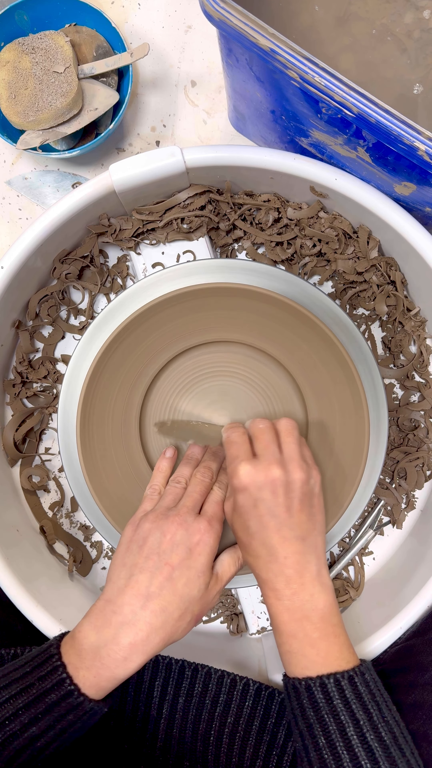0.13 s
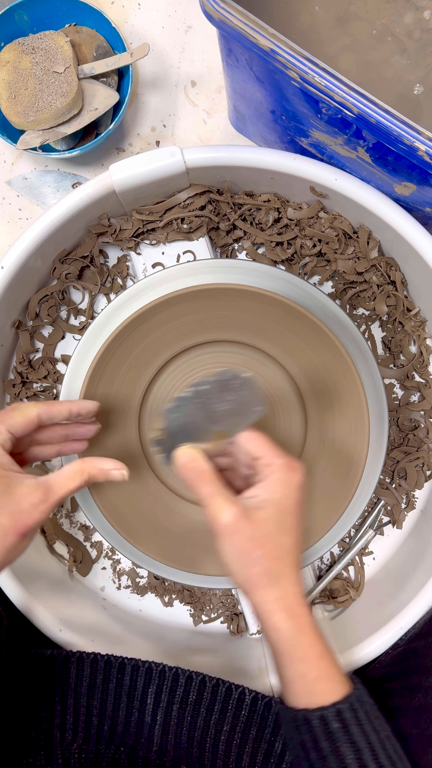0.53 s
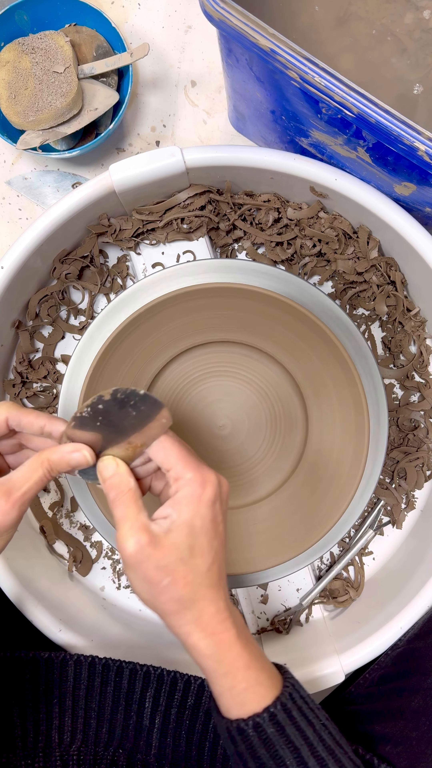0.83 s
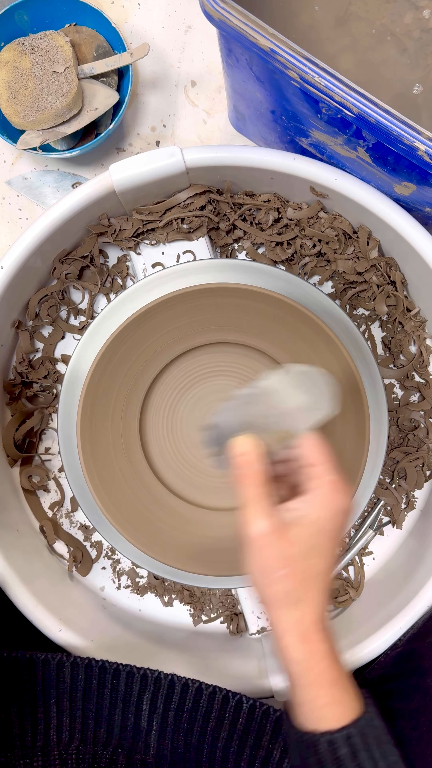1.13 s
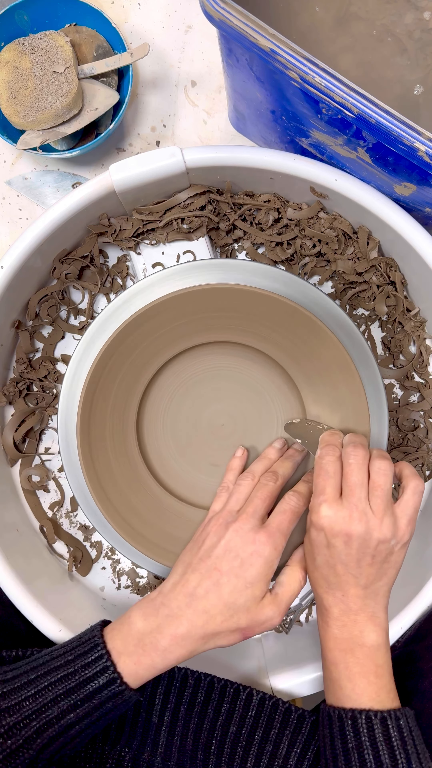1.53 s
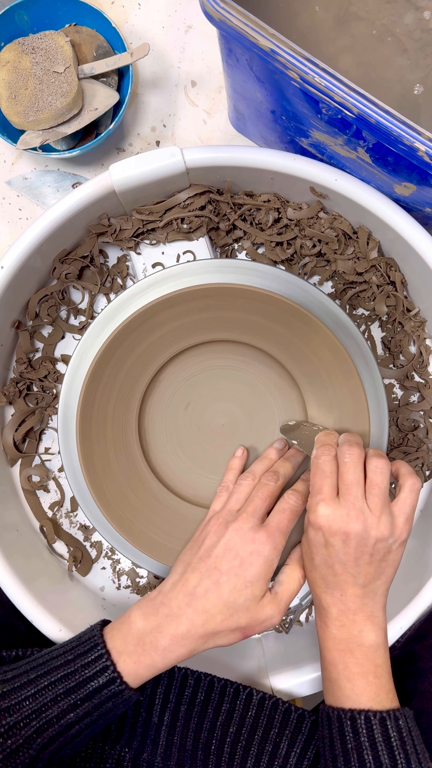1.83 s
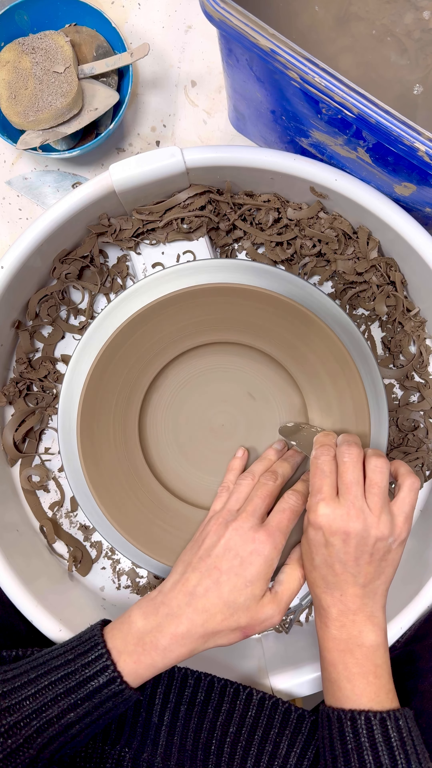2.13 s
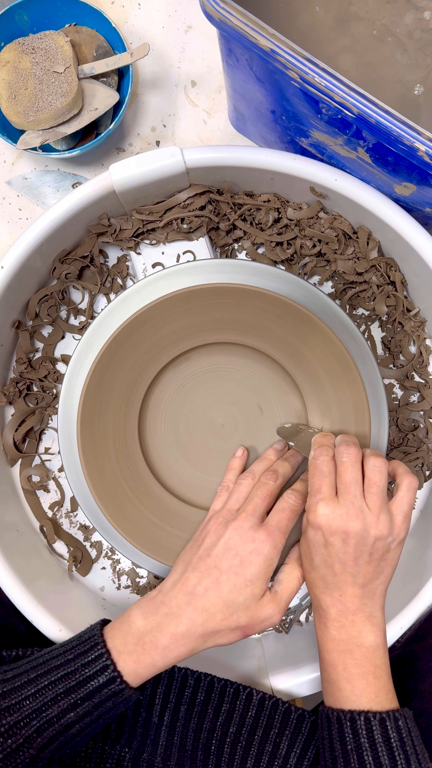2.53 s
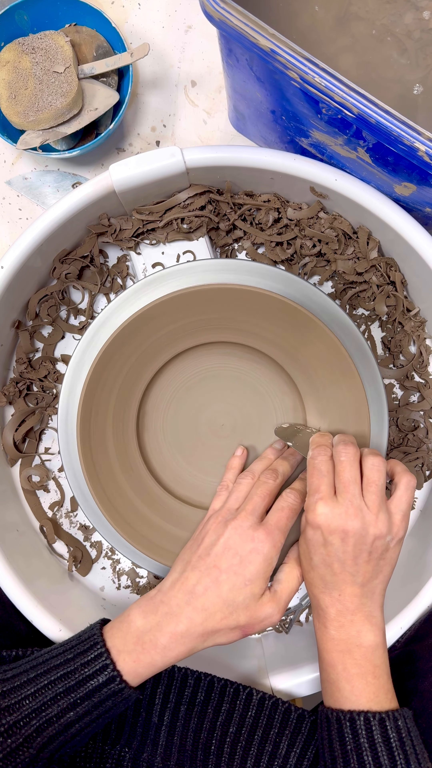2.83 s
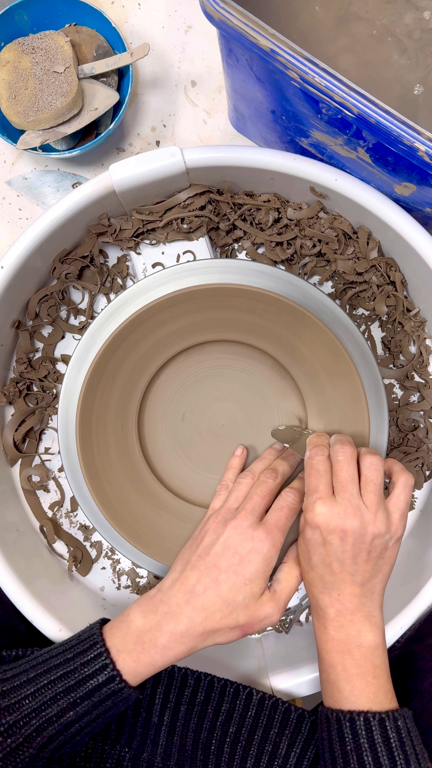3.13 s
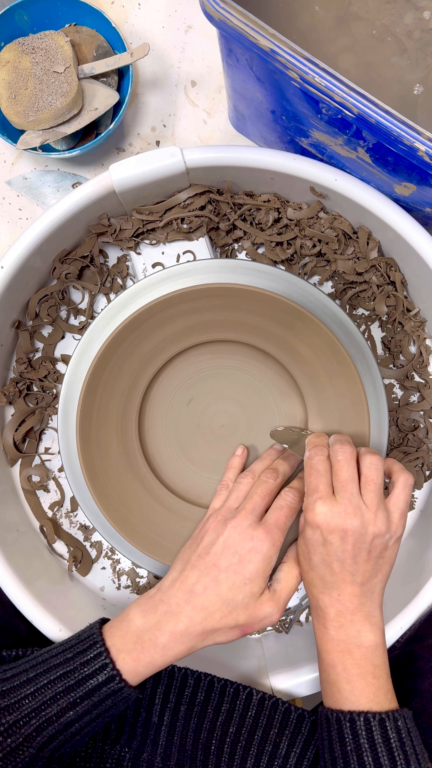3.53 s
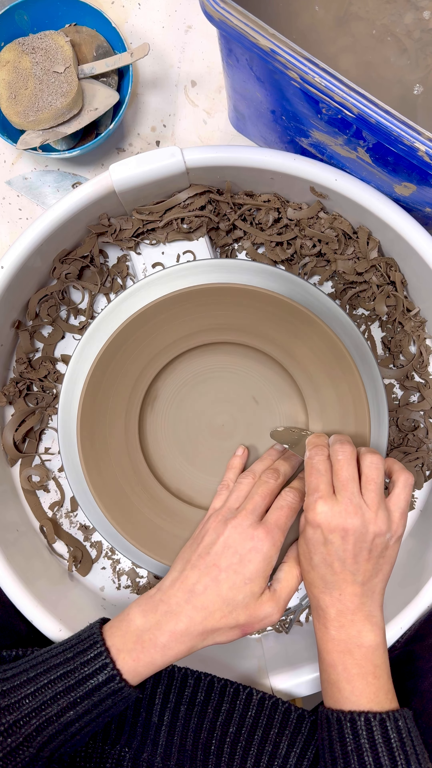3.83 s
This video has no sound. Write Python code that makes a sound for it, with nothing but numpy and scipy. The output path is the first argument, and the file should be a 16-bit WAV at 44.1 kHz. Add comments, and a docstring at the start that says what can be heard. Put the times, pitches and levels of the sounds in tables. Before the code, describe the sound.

Metal scraper rasping wet clay in rough rhythmic strokes over a steady pottery wheel motor hum

```python
"""A pottery wheel spins with a steady motor whine (sine tones) and a whirr (filtered noise).
Hands shift over it with a soft rumble and bumps, then one tap sounds as they lift a thin steel scraper.
After an abrupt cut the wheel turns slower and the scraper trims the clay: grit (random tiny impacts) catches
the edge and rings the blade (filters with resonances), swelling once a turn, with swishes, rasps and ticks.
A close pair of microphone ports hears it, with quick reflections from the splash pan."""
import sys
import numpy as np
from scipy import signal
from scipy.fft import rfft, irfft
from scipy.io import wavfile

SR = 44100
rng = np.random.default_rng(int(sys.argv[2]) if len(sys.argv) > 2 else 0)


def persist_wave(psi):
    """Save psi, clipped to +-1, as 16-bit WAV."""
    counts = np.round(np.clip(psi, -1, 1) * 32767).astype(np.int16)
    wavfile.write(sys.argv[1], SR, np.atleast_2d(counts).T)


N = 175959

# Levels below are relative: later steps still filter and balance them.
CUT_S, FADE_IN_S = 1.3365, 0.017
EDGE_HZ = 15850  # top of the pitch range that is kept

# Difference between the two ports: [f/Hz, phase by which left leads/rad] and [f/Hz, left minus right level/dB]
PORT_PHASE = [(400, 0), (780, 1), (1200, 0), (2000, 0), (3100, 0.42), (5000, 0.86), (6700, -0.63),
              (10900, -3), (13300, -4), (16000, -5)]
PORT_BALANCE = [(100, 0.83), (440, 1.23), (800, -1.2), (2800, -0.8), (4500, 1), (8000, 0.46)]

# Motor speed, running free and under the scraper: [t/s, whine f/Hz]
FREE_SPEED = [(0, 443), (.35, 443.7), (1.33, 445.2)]
LOADED_SPEED = [(1.5, 368), (2, 366.3), (2.5, 368), (3.25, 365.5), (3.75, 363), (4, 366.4)]
# Partials of the whine, free and under the scraper: [multiple of the whine pitch, level/dB]
FREE_PARTIALS = [(1, -28), (2, -50.5)]
LOADED_PARTIALS = [(1, -38), (2, -57.5)]
# Thin, quickly wavering high tones of the drive, running free: [middle f/Hz, level/dB]
DRIVE_TONES = [(5076, -73), (7203, -68.5), (7574, -64)]
# The octave of the free whine slowly grows; its table level holds at the middle time
OCTAVE_RISE_DB_PER_S, OCTAVE_MID_S = 5.5, 0.67

# Colour of the wheel and room whirr: [f/Hz, level per Hz/dB]
WHIRR_COLOUR = [(25, -33.5), (110, -11), (170, -3), (280, -7), (800, -5), (1100, -15.5), (2400, -20),
                (3100, -27.5), (5600, -22.5), (7700, -12), (8800, -14.5), (10500, -15), (13500, -42),
                (15600, -19)]
WHIRR_DB, WHIRR_LOADED_DB = -48, -1  # level, and its change under the scraper

# Low rumble while the hands shift: [t/s, level/dB], and its colour: [f/Hz, level per Hz/dB]
RUMBLE = [(.04, -65), (.1, -41.5), (.25, -44.5), (.4, -43.5), (.66, -41), (.78, -48), (.9, -56),
          (1.22, -55.5), (1.33, -57)]
RUMBLE_COLOUR = [(20, -48), (38, -29), (52, -2.5), (90, -1), (190, -7), (300, -7), (600, -28.5),
                 (2000, -41.5)]
# Resonances of the wheel's frame: [f/Hz, width/Hz, lift/dB]
FRAME_MODES = [(89, 8.3, 6.5), (184, 14, 6), (235, 7.9, 2)]
# Colour of the light touch as the hands shift: [f/Hz, level per Hz/dB]
TOUCH_COLOUR = [(700, -9), (1400, 2), (1900, -18), (2600, 0.5), (2900, -21.5), (8000, -19)]
TOUCH_DB, TOUCH_S = -55, .12
# Soft bumps on the wheel's frame: [start t/s, f/Hz, level/dB]
BUMPS = [(0.094, 85, -31), (0.611, 252, -30.5), (0.694, 86, -34), (1.2, 166, -35)]
BUMP_S = 0.011  # time from the start of a bump to its strongest point

# Resonances of the blade and the clay under it: [f/Hz, width/Hz, lift/dB]
BLADE_MODES = [(1218, 170, 5), (1295, 54, -12), (1475, 113, 8), (2088, 59, 10), (2280, 190, -2.5),
               (2830, 320, 5.5), (3090, 53, 6), (3323, 36, 8.5), (3860, 55, 7.5), (5670, 170, 5),
               (6714, 210, 8.5)]
# Ticks, one tap in the hand and then hard grains: [t/s, level/dB, clay body lift/dB, treble lift/dB]
CATCHES = [(0.959, -27.5, -17, 9), (1.458, -28, -8, 19), (2.027, -19, -16, 0), (2.058, -17.5, -16, -7),
           (2.199, -22, -10, -17), (2.489, -23, 8, 5), (2.823, -21.5, 18, 11), (3.172, -22.5, 1, 12),
           (3.338, -19.5, 6, 10), (3.599, -21.5, 8, 10), (3.742, -25, -7, -6), (3.776, -16.5, -6, -15),
           (3.840, -22, -10, -11), (3.924, -21.5, 4, 3.5)]
# Colour shared by the ticks: [f/Hz, level per Hz/dB]
CATCH_COLOUR = [(300, -28), (900, -13), (1300, -4), (2500, -8), (3000, -2), (4500, -17), (7000, -10),
                (16000, -15)]
CATCH_DB, CATCH_DECAY_S = -4.5, 0.0014
CATCH_SNAP = 2.7  # strength of the first snap; the crunch starts at 1

# The edge bites once a turn, on the high side of the clay:
# [start t/s, length/s, body level/dB, ring level/dB, hiss level/dB]
BITES = [(1.467, .33, -46.5, -41, -45.5), (1.883, .33, -45.5, -41, -46), (2.31, 0.2, -43.5, -44.5, -49.5),
         (2.723, 0.24, -44.5, -48, -44.5), (3.102, 0.29, -42.5, -39, -43.5),
         (3.564, 0.27, -44.5, -42.5, -45.5)]
BITE_ATTACK_S, BITE_RELEASE_S = 0.024, 0.023
RING_ATTACK_S, RING_RELEASE_S = 0.072, 0.048
LIGHT_BODY_DB, LIGHT_RING_DB, LIGHT_HISS_DB = -50, -42, -49.5  # light contact between bites
# Short rasps where the edge sticks and chatters: [start t/s, length/s, body level/dB, ring level/dB]
RASPS = [(2.476, 0.019, -38.5, -38.5), (2.907, 0.024, -39.5, -36.5), (2.958, 0.08, -46, -39),
         (3.334, 0.014, -32, -36), (3.761, 0.034, -40.5, -36.5)]
RASP_EDGE_S = 0.0044  # attack and release
# Broad swishes as shavings peel off: [start t/s, length/s, level/dB]
SWISHES = [(1.562, 0.19, -41), (2.05, 0.12, -42.5), (2.521, 0.064, -39.5)]
# Faint fizz at the very top: [t/s, level/dB]
FIZZ = [(1.35, -62), (1.62, -55), (2.55, -54.5), (2.72, -60), (2.86, -41), (2.92, -41), (2.97, -62),
        (3.3, -53)]
# Colours of the five parts of the scrape: [f/Hz, level per Hz/dB]
BODY_COLOUR = [(200, -22.5), (700, -12.5), (1000, -18), (1200, 0), (2100, -2.5), (2500, -7), (4000, -15),
               (9000, -54)]
RING_COLOUR = [(500, -40), (2300, -9), (2700, -2.5), (3300, -3), (3600, -10.5), (4300, -14.5),
               (8000, -29.5)]
HISS_COLOUR = [(100, -20.5), (400, 2.5), (800, -3.5), (1500, -5.5), (4400, -1.5), (5300, 0.5), (7000, -0.5),
               (8500, -9), (10000, 7), (11500, -13), (16000, -6.5)]
SWISH_COLOUR = [(100, -24), (300, 12), (800, 4), (1800, -9), (3000, 7.5), (4500, -0.5), (7000, 3.5),
                (8500, -1), (11000, 0), (16000, -4)]
FIZZ_COLOUR = [(6000, -17), (10000, -10), (12500, -4), (14500, 0), (16000, -18)]
SHAKE_HZ, SHAKE = 55.6, 0.6  # the drive shakes the edge slightly: rate, and share next to the random judder
# Slips of the edge on the clay: rate, fade and share of the grit that they carry
SLIPS_PER_S, SLIP_S, SLIP_SHARE = 90, 0.0035, 0.36
# The blade flexes under the fingers: pitch change (share), spread of resonance strength, rate of wandering
FLEX, FLEX_DB, FLEX_HZ = .012, 2, 14


def amp(db):
    """Turns decibels into gain."""
    return 10 ** (np.asarray(db) / 20)


def unit(x):
    """Scales to an average strength (rms) of 1."""
    return x / np.sqrt(np.mean(x ** 2) + 1e-20)


def by_hz(points, hz):
    """Reads a table on a log-frequency axis, as the ear spaces pitch."""
    f, value = np.transpose(points)
    return np.interp(np.log(hz + 1), np.log(f + 1), value)


def by_time(rows, axis=1):
    """Reads one column of a curve at every sample."""
    rows = np.array(rows)
    return np.interp(np.arange(N) / SR, rows[:, 0], rows[:, axis])


def wander(rate_hz):
    """Smooth random drift of rms 1, mostly slower than the given rate."""
    hz = np.fft.rfftfreq(N, 1 / SR)
    smooth = rfft(rng.standard_normal(N)) / (1 + (hz / rate_hz) ** 4)
    return unit(irfft(smooth, N))


def coloured(x, colour, modes=(), size=4096):
    """Filters with unit energy: a broad colour lifted by resonances."""
    hz = abs(np.fft.fftfreq(size, 1 / SR))
    lifts = sum(lift / (1 + (2 * (hz - f) / width) ** 2) for f, width, lift in modes)
    db = by_hz(colour, hz) + lifts
    # Minimum phase: the filter answers only after its input, and as soon as it can
    spectrum = np.exp(np.conj(signal.hilbert(np.log(amp(db)))))
    taps = np.fft.ifft(spectrum).real[:size // 2]
    return signal.oaconvolve(x, taps / np.linalg.norm(taps))[:N]


def before_cut():
    """One at first, falling to zero in the last half millisecond before the cut."""
    return np.clip((CUT_S - np.arange(N) / SR) * 2000, 0, 1)


def after_cut():
    """Zero before the cut, then a quick fade to one."""
    return np.clip((np.arange(N) / SR - CUT_S) / FADE_IN_S, 0, 1)


def ports(x):
    """Spreads a near source over the two microphone ports, by level and phase."""
    hz = np.fft.rfftfreq(N, 1 / SR)
    # Each port takes half of the difference, in opposite directions
    half = amp(by_hz(PORT_BALANCE, hz) / 2) * np.exp(.5j * by_hz(PORT_PHASE, hz))
    return irfft(rfft(x) * np.array([half, 1 / half]), N)


def whine(speed, partials, flutter, flutter_hz, jitter_hz, octave_db=0):
    """Motor partials locked to one speed, with slight flutter of level."""
    turns = np.cumsum(by_time(speed) + jitter_hz * wander(28)) / SR
    out = np.zeros(N)
    for k, db in partials:
        level = np.sqrt(2) * amp(db + octave_db * (round(k) == 2))
        out += level * (1 + flutter * k * wander(flutter_hz)) * np.sin(2 * np.pi * round(k) * turns)
    return out


def motor():
    """A high whine with wavering drive tones, running free; a lower, softer one during trimming."""
    octave_db = OCTAVE_RISE_DB_PER_S * (np.arange(N) / SR - OCTAVE_MID_S)
    free = whine(FREE_SPEED, FREE_PARTIALS, flutter=0.059, flutter_hz=45, jitter_hz=0.52, octave_db=octave_db)
    for hz, db in DRIVE_TONES:
        turns = np.cumsum(hz + 18 * wander(30)) / SR
        free += np.sqrt(2) * amp(db) * np.sin(2 * np.pi * turns)
    loaded = whine(LOADED_SPEED, LOADED_PARTIALS, flutter=0.05, flutter_hz=40.6, jitter_hz=0.69)
    return ports(free * before_cut()) + loaded * after_cut()


def echoes(x, decay_s, channels=2, size=8000):
    """A dying spray of sparse reflections, different in each channel."""
    t = np.arange(size) / SR
    taps = rng.standard_normal((channels, size)) * (rng.random((channels, size)) < .1)
    taps = taps * np.exp(-t / decay_s) * (t > .001)
    taps /= np.linalg.norm(taps, axis=1, keepdims=True)
    return signal.oaconvolve(x[None], taps, axes=1)[:, :N]


def whirr():
    """Noise of the spinning wheel, partly diffuse, with a thicket of faint machine tones in the treble."""
    hz = np.fft.rfftfreq(N, 1 / SR)
    phases = np.exp(2j * np.pi * rng.random(len(hz)))
    chosen = (rng.random(len(hz)) < .002) * (hz > 2000)
    tones = unit(irfft(phases * chosen, N))
    level = amp(WHIRR_DB + 1.4 * wander(24))
    noise = level * coloured(rng.standard_normal(N) + .5 * tones, WHIRR_COLOUR)
    wide = ports(noise) + amp(-13.0) * echoes(noise, decay_s=0.027)
    return wide * (before_cut() + amp(WHIRR_LOADED_DB) * after_cut())


def grit(per_s, spread_db):
    """Tiny impacts of uneven size at random times."""
    size = amp(spread_db * np.minimum(rng.exponential(1, N), 4))
    return unit(size * rng.choice([-1., 1.], N) * (rng.random(N) < per_s / SR))


def press(start, length, attack_s=BITE_ATTACK_S, release_s=BITE_RELEASE_S):
    """Pressure rises, holds and lets go."""
    age = np.arange(N) / SR - start
    return np.clip(age / attack_s, 0, 1) * np.exp(-np.clip((age - length) / release_s, 0, 20))


def hands():
    """Lumpy rumble and bumps in the wheel's frame, and a light touch on the clay, as the hands slide and lift."""
    out = coloured(grit(per_s=500, spread_db=1.5), RUMBLE_COLOUR, FRAME_MODES) * amp(by_time(RUMBLE))
    out += coloured(rng.standard_normal(N), TOUCH_COLOUR) * amp(TOUCH_DB) * press(0, TOUCH_S)
    for start, hz, db in BUMPS:
        age = np.maximum(np.arange(N) / SR - start, 0)
        swell = age / BUMP_S * np.exp(-age / BUMP_S)
        out += amp(db) * swell * np.sin(2 * np.pi * hz * age)
    return out * before_cut()


def catches():
    """Each tap or hard grain gives a snap and a short crunch that ring the blade."""
    out, t = np.zeros(N), np.arange(N) / SR
    for start, db, body_db, treble_db in CATCHES:
        age = t - start
        fade = (age > 1 / SR) * np.exp(-np.minimum(abs(age) / CATCH_DECAY_S, 20))
        crunch = rng.choice([-1., 1.], N) * fade
        crunch[round(start * SR)] += CATCH_SNAP
        colour = [(hz, level + body_db * (hz < 2500) + treble_db * (4000 < hz < 9000))
                  for hz, level in CATCH_COLOUR]
        out += amp(db + CATCH_DB) * coloured(crunch, colour, BLADE_MODES)
    return out


def slips():
    """Uneven stick and slip: each slip frees a burst of grit that dies quickly."""
    kicks = rng.uniform(0.56, 1, N) * (rng.random(N) < SLIPS_PER_S / SR)
    bursts = signal.lfilter([1], [1, -np.exp(-1 / (SLIP_S * SR))], kicks)
    return unit(1 - SLIP_SHARE + SLIP_SHARE * unit(bursts))


def blade(x, colour, count=4):
    """Rings the blade, passing at random between a few states of bending with their own resonances."""
    weights = np.exp([wander(FLEX_HZ) for _ in range(count)])
    weights /= weights.sum(0)
    # Each sample drives one state, drawn with odds that wander
    state = (rng.random(N) > np.cumsum(weights, 0)).sum(0)
    out = np.zeros(N)
    for k, bend in enumerate(np.linspace(-1, 1, count)):
        modes = [(hz * (1 + FLEX * bend), width, lift + FLEX_DB * rng.standard_normal())
                 for hz, width, lift in BLADE_MODES]
        out += coloured(x * (state == k), colour, modes)
    return out


def scraper():
    """Coarse grit knocks clay and blade in short slips, fine grit hisses; the edge judders over both."""
    coarse, fine = grit(per_s=3000, spread_db=1.5), grit(per_s=8000, spread_db=2.5)
    judder = wander(50) + SHAKE * np.sin(2 * np.pi * SHAKE_HZ * np.arange(N) / SR)
    slip = slips()

    # Bites and rasps add their power to the light contact
    body_bites, ring_bites, hiss_bites = np.zeros(N), np.zeros(N), np.zeros(N)
    for start, length, body_db, ring_db, hiss_db in BITES:
        bite = press(start, length)
        body_bites += amp(body_db) * bite
        ring_bites += amp(ring_db) * press(start, length, RING_ATTACK_S, RING_RELEASE_S)
        hiss_bites += amp(hiss_db) * bite
    body_level = np.hypot(amp(LIGHT_BODY_DB), body_bites)
    ring_level = np.hypot(amp(LIGHT_RING_DB), ring_bites)
    hiss_level = np.hypot(amp(LIGHT_HISS_DB), hiss_bites)
    for start, length, body_db, ring_db in RASPS:
        rasp = press(start, length, RASP_EDGE_S, RASP_EDGE_S)
        body_level = np.hypot(body_level, amp(body_db) * rasp)
        ring_level = np.hypot(ring_level, amp(ring_db) * rasp)
    swish_level = sum(amp(db) * press(start, length) for start, length, db in SWISHES)

    body = blade(coarse * slip * body_level * amp(0.76 * judder - 0.5), BODY_COLOUR)
    knocks = unit(coarse + 1.12 * grit(per_s=1500, spread_db=1))
    ring = blade(knocks * slip * ring_level * amp(0.91 * judder - 1.14), RING_COLOUR)
    hiss_grit = unit(fine + 0.48 * coarse * slip)
    hiss = coloured(hiss_grit * hiss_level * amp(3.0 + 1.08 * judder), HISS_COLOUR, BLADE_MODES)
    soft_modes = [(f, width, 0.54 * lift) for f, width, lift in BLADE_MODES]
    swish = coloured(fine * swish_level * amp(judder), SWISH_COLOUR, soft_modes)
    fizz_level = amp(by_time(FIZZ) + 3.5 + 2.2 * judder)
    fizz = coloured(grit(per_s=3300, spread_db=2.5) * fizz_level, FIZZ_COLOUR)
    return (body + ring + hiss + swish + fizz) * after_cut()


def scene():
    """The hands, the tool and its splash pan reflections over the running wheel."""
    tool = scraper() + catches()
    dull = signal.lfilter(*signal.butter(2, 8000, fs=SR), tool)  # the pan returns less treble
    reflections = amp(-14.5) * echoes(dull, decay_s=0.014)
    return ports(tool + hands()) + reflections + motor() + whirr()


def record(dry):
    """The recorder's band limit: a steep filter takes away the highest treble."""
    taps = signal.firwin(511, EDGE_HZ, window=("kaiser", 9), fs=SR)
    return signal.oaconvolve(dry, taps[None], "same")


dry = scene()
out = record(dry)
persist_wave(out)
```